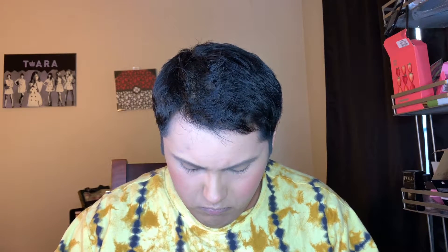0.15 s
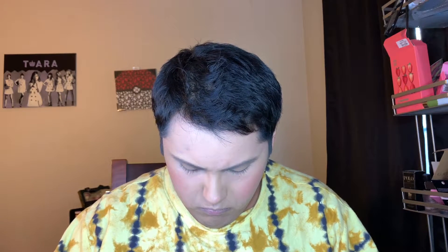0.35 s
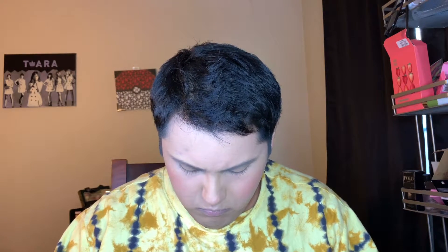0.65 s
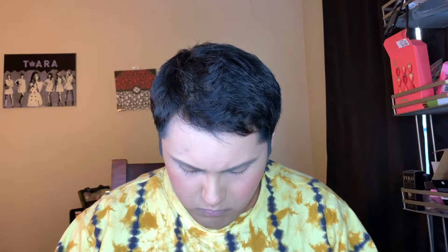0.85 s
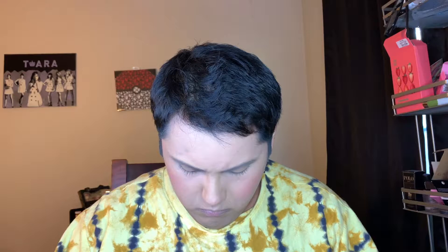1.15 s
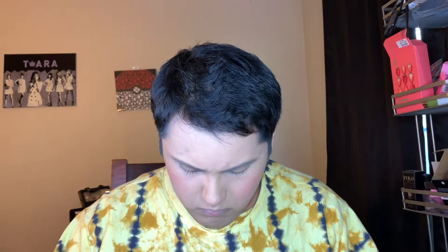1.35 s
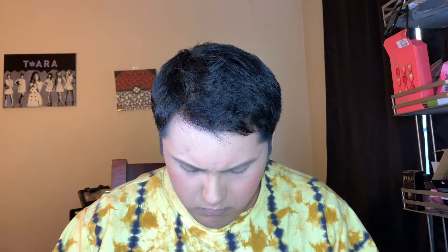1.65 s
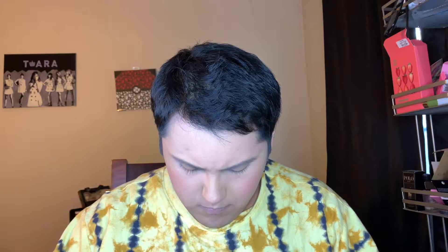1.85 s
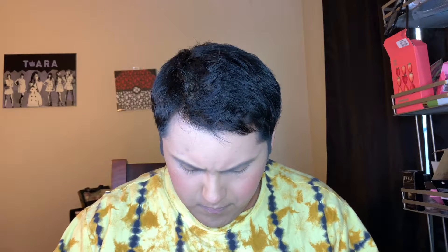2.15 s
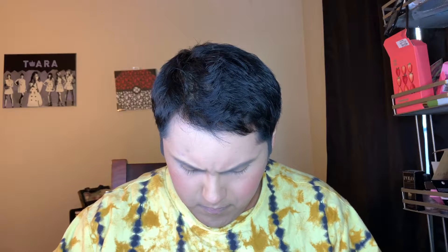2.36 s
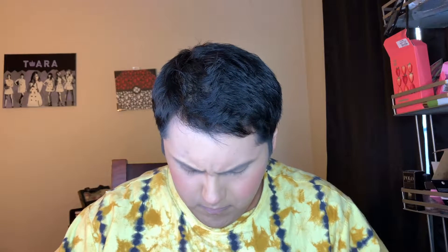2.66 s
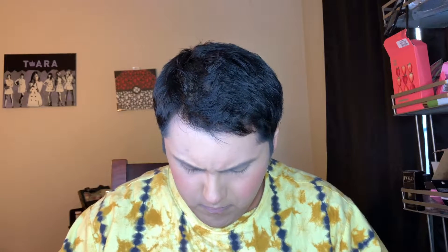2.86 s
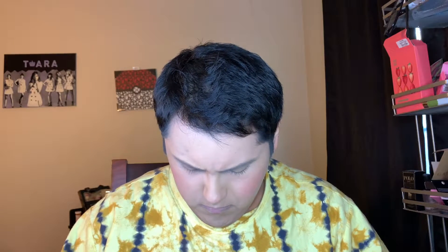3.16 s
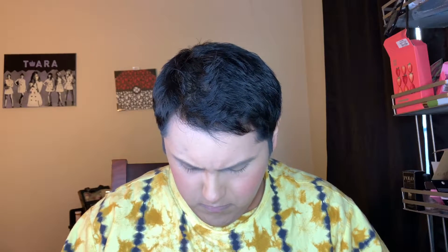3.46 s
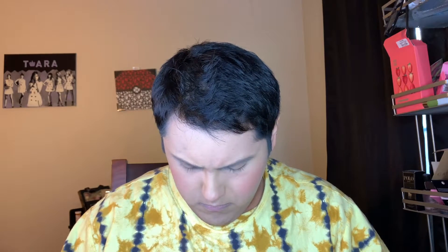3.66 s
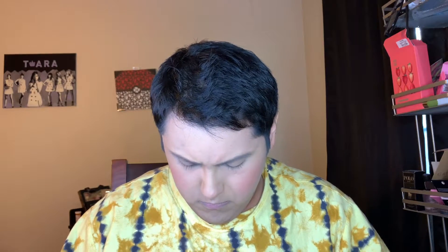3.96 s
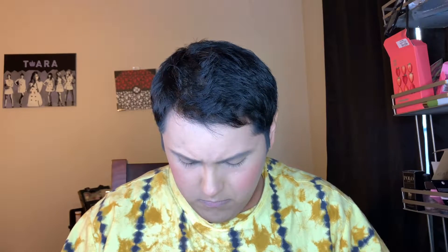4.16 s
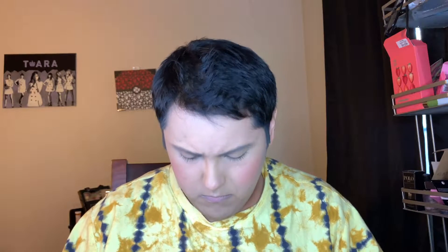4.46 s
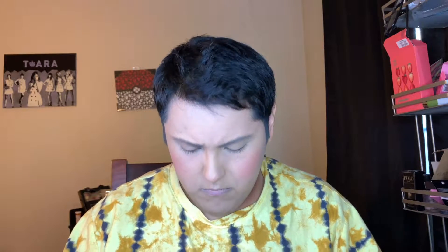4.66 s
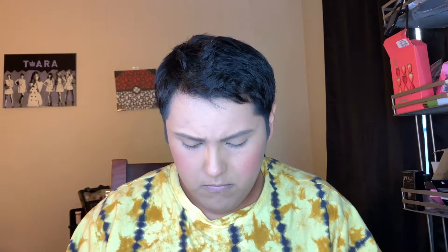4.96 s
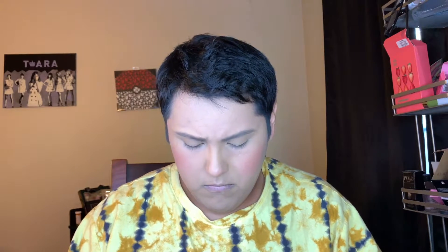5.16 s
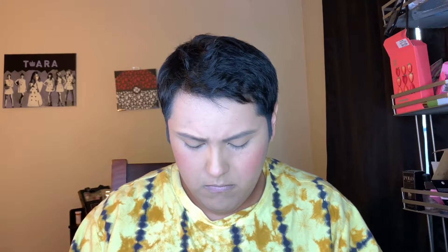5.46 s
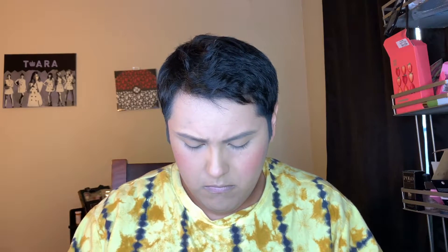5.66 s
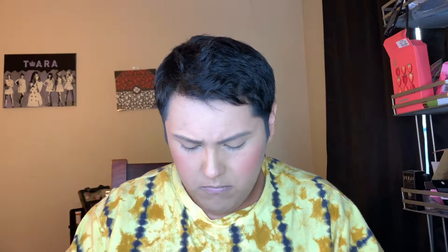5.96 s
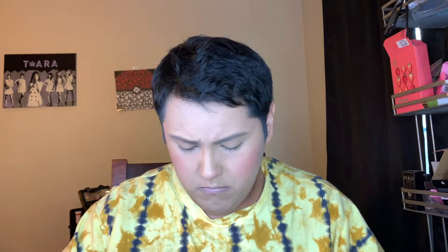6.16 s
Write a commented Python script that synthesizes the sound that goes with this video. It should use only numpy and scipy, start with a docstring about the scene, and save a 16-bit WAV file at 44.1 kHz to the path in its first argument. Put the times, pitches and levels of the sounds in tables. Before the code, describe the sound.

Soft ticks build into sharp clacks and short rattles as plastic cosmetic cases are sorted, over a quiet hum.

```python
"""Plastic makeup cases sorted on a desk in a small furnished room; an appliance hums faintly throughout.
First, soft finger touches and a few ticks, sharper from 1.8 s. From 2.5 s the cases clack and rattle:
each contact rings a shell, bounces off the desk top and excites the room. From 4.2 s short slides rub
and rasp between the knocks. The loudest clacks come last, from 5.5 to 6.1 s."""
import sys
import numpy as np
from scipy import signal
from scipy.fft import rfft, irfft, next_fast_len
from scipy.io import wavfile
from scipy.ndimage import map_coordinates

SR = 44100
rng = np.random.default_rng(int(sys.argv[2]) if len(sys.argv) > 2 else 0)


def persist_wave(psi):
    """Save psi, clipped to +-1, as 16-bit WAV."""
    counts = np.round(np.clip(psi, -1, 1) * 32767).astype(np.int16)
    wavfile.write(sys.argv[1], SR, np.atleast_2d(counts).T)


N = 277731

# appliance hum: pitch_hz, relative_db
HUM_PARTIALS = [(75.4, -63.5), (118.4, -64.5), (263.8, -71), (328.4, -77.5)]
# appliance fan: centre_hz, width_hz, gain_db
FAN_MODES = [(1000, 120, -9), (1388, 82, -6), (1930, 180, 2.5), (2820, 380, 3.5)]
# room tone: freq_hz, relative_density_db
AIR_SPECTRUM = [(25, -29.5), (60, -12.5), (135, -1.5), (260, -15), (400, -25.5), (600, -32.5), (750, -37.5),
                (1000, -35), (2000, -44), (2500, -50), (4000, -50), (8000, -52.5), (16000, -58)]
# low room modes: centre_hz, width_hz, gain_db
ROOM_MODES = [(57, 18, -1.5), (92, 5.5, -12.5), (144.7, 17, 0.5), (210, 25, -12.5), (258.3, 3.9, -8.5)]
# room decay: freq_hz, t60_s
ROOM_DECAY = [(300, 0.42), (1500, 0.29), (4000, 0.2), (5700, 0.27), (8000, 0.24), (16000, 0.17)]
# finger on a case: peak_s, level_db, centre_hz, sigma_s
TOUCHES = [(0.04, -71, 13200, 0.011), (0.191, -77, 5330, 0.0067), (0.83, -84, 3030, 0.0098),
           (0.943, -79, 6800, 0.015), (1.157, -81, 6040, .016), (2.23, -69, 7600, 0.012),
           (4.748, -58, 517, 0.0067), (4.882, -73.5, 3130, 0.0092)]
# hollow of a rubbed case: centre_hz, width_hz, gain_db
RUB_MODES = [(1580, 140, -9), (1900, 480, 3)]
# edge of a rubbed case: centre_hz, width_hz, gain_db
RASP_MODES = [(2670, 400, 4.5), (3600, 150, 4.5), (6000, 960, -13.5), (7220, 1100, -18.5)]
# pushes over the desk: start_s, length_s, rub_db, rasp_over_rub_db
SLIDES = [(4.223, 0.2, -82.5, 4), (4.408, .02, -63.5, -3), (4.529, 0.011, -67, -4.5),
          (5.018, 0.096, -68.5, 3.5), (5.051, 0.014, -57.5, 4.5), (5.273, .06, -63, -8),
          (5.381, 0.012, -50.5, -11), (5.464, 0.029, -59.5, -8), (5.674, 0.054, -68, -4)]
# case in hand: start_s, wall_treble_db, shell modes (centre_hz, width_hz, gain_db)
CASE_SHELLS = [ (0, 6, [(650, 300, -9), (1460, 124, 1), (1850, 180, -4), (2500, 360, -9), (5000, 610, 4),
               (6800, 1200, 3), (8000, 640, 0)]), (2.45, -8.5, [(294, 99, -6.5), (547, 190, -2.5),
               (970, 190, 3), (1870, 440, -5.5), (3460, 940, -2.5), (5300, 1700, -3.5), (7360, 1100, -3)]),
               (2.8, -5.5, [(1150, 320, -2), (1840, 330, 5.5), (2900, 240, -5), (3960, 1500, -4.5),
               (6300, 1060, -7.5)]), (3.08, -11, [(810, 68, -6), (1134, 150, -6.5), (1994, 280, 1),
               (3750, 670, -15), (5900, 490, -9), (9200, 2500, 3.5)]), (3.4, -9, [(390, 390, -5),
               (960, 260, -1), (1940, 500, -3), (3400, 630, 4), (4560, 670, -12.5), (11500, 238, -14)]),
               (3.75, -4.5, [(300, 116, -10), (567, 106, -10), (770, 100, -3), (2007, 100, 3.5),
               (3380, 437, 4.5), (4250, 1500, 1), (6820, 620, -0.5), (7840, 230, 10)]),
               (4.2, -7, [(559, 108, -14.5), (836, 190, 0.5), (2000, 510, -2.5), (2790, 730, -0.5),
               (5770, 1260, -14.5), (11350, 2000, -2)]), (4.95, -7, [(503, 210, 6.5), (1500, 200, -19.5),
               (2000, 440, 7), (2680, 520, -4), (3600, 670, 0.5), (5840, 550, -5.5), (11400, 500, -8)]),
               (5.45, -7.5, [(633, 39, 20), (758, 130, 8), (1830, 170, 8.5), (2100, 750, 6.5),
               (3260, 320, -5), (5970, 770, -7)]), (5.55, -3, [(655, 90, -9.5), (1920, 320, -0.5),
               (3630, 590, 1), (5100, 820, 0), (6170, 550, 5.5), (7000, 700, -2)]),
               (5.9, -4, [(623, 220, -7), (1097, 320, -3), (1815, 330, 4), (2150, 340, -6.5),
               (3380, 1040, 8.5), (4510, 800, -3), (6900, 4100, 2)]), ]
# knock, body and crack bands of a contact: low_hz, high_hz
CONTACT_BANDS = [(300, 1300), (1300, 4800), (4800, 17000)]
# single contacts: start_s, body_db, crack_over_body_db (hard edge > 0, cushioned < 0)
CLACKS = [(0.028, -65.5, -7), (0.4038, -77.5, 2), (1.701, -77.5, 6), (1.8298, -58.5, 9),
          (1.8516, -51.5, 6.5), (1.8977, -72, 11), (1.9732, -46, 5), (1.99, -56, 10), (2.1148, -41, 3.5),
          (2.2768, -47.5, 13), (2.2833, -42, 0), (2.5392, -38.5, 5.5), (2.5562, -29.5, 2),
          (2.5676, -30.5, -2), (2.6044, -31.5, -0.5), (2.6144, -47.5, 11), (2.8924, -35, 2),
          (2.9069, -30, -0.5), (2.9415, -34.5, 0.5), (2.9554, -35, 3.5), (2.98, -35, -2),
          (3.132, -36, -2.5), (3.1579, -28, -4), (3.301, -36.5, 1), (3.3154, -31, -3), (3.3397, -33.5, -5),
          (3.4454, -62, 10), (3.4726, -34, 2), (3.4905, -40, 3.5), (3.5267, -34.5, -1), (3.603, -38, 2),
          (3.6226, -42, 4), (3.6417, -28, -5), (3.6537, -29, 1.5), (3.669, -36, 4), (3.8283, -33.5, 2),
          (3.8493, -28, 1), (3.8585, -28.5, -1), (3.8692, -24.5, 0.5), (3.884, -26, 2.5), (3.896, -30.5, 2),
          (4.4243, -46, -19.5), (4.437, -39, -29), (4.545, -50.5, -29.5), (4.612, -57, 1.5),
          (4.62, -37.5, -3), (4.6299, -33.5, 1), (4.6767, -41.5, -16), (5.1386, -30.5, -12.5),
          (5.1422, -25, -3), (5.1765, -33, 2), (5.382, -46, -10), (5.3939, -39, 5.5), (5.477, -56.5, 6),
          (5.4977, -61.5, 12), (5.5332, -19.5, -2), (5.536, -26.5, -1.5), (5.544, -23, -3),
          (5.5715, -33, 10), (5.5863, -29, 0), (5.6071, -34.5, -6), (5.7556, -32, 5), (5.7714, -37.5, 3),
          (5.869, -51.5, 5), (5.9592, -23.5, 1.5), (6.0568, -23.5, 2), (6.0755, -21.5, 1)]
# low knock of single contacts: time_s, knock_over_body_db
KNOCK_CURVE = [(1.85, -8.5), (2.25, -10), (2.55, -9), (2.95, -14), (3.65, -12.5), (4.45, -12),
               (5.15, -17.5), (5.55, -13), (6.05, -18.5)]
# loose cases jostling: start_s, length_s, gap_s, body_db, crack_over_body_db
JOSTLES = [(2.547, .051, 0.0066, -31.5, 0.5), (2.9473, .029, 0.0077, -39, 0),
           (3.643, .03, .0065, -41.5, 1.5), (3.859, .048, 0.0076, -34, -1),
           (5.161, .035, .0053, -38.5, 4.5), (5.551, .017, .0037, -33, 5)]


def amp(db):
    """Decibels to gain."""
    return 10 ** (np.asarray(db) / 20)


def unit_rms(x):
    """Scale to rms 1."""
    return x / np.sqrt(np.mean(x ** 2) + 1e-20)


def log_interp(points, hz):
    """Read (freq_hz, value) points on a log axis."""
    freqs_hz, values = np.transpose(points)
    return np.interp(np.log(hz + 1), np.log(freqs_hz + 1), values)


def wobble(rate_hz):
    """Smooth random curve, rate_hz knots a second."""
    knots = rng.standard_normal(int(N * rate_hz / SR) + 4)
    return map_coordinates(knots, [np.arange(N) * rate_hz / SR])


def filtered(x, response):
    """Apply a complex frequency response."""
    size = next_fast_len(2 * len(x))
    return irfft(rfft(x, size) * response(np.fft.rfftfreq(size, 1 / SR)), size)[:len(x)]


def resonances(modes, f):
    """Causal response of damped modes."""
    return sum(amp(db) * 1j * f * width / (hz * hz - f * f + 1j * f * width) for hz, width, db in modes)


def add(track, start_s, sound):
    """Mix a sound into a track."""
    part = track[round(start_s * SR):][:len(sound)]
    part += sound[:len(part)]


def appliance(air_db=-60, drone_db=-63, hum_gain_db=-1, waver_db=1.5, drift_rad=0.15):
    """An appliance hums, whirs and stirs the low room modes over faint hiss."""
    t = np.arange(N) / SR
    air = filtered(rng.standard_normal(N),
                   lambda f: amp(log_interp(AIR_SPECTRUM, f)) * (1 + resonances(FAN_MODES, f)))
    low_band = lambda f: f ** 2 / (f ** 2 + 45 ** 2) / (1 + (f / 330) ** 6)
    drone = filtered(rng.standard_normal(N), lambda f: resonances(ROOM_MODES, f) * low_band(f))
    hum = np.zeros(N)
    for hz, db in HUM_PARTIALS:
        peak = np.sqrt(2) * amp(db + waver_db * wobble(3.3))
        hum += peak * np.sin(2 * np.pi * hz * t + drift_rad * wobble(3.5))
    return amp(air_db) * unit_rms(air) + amp(drone_db) * unit_rms(drone) + amp(hum_gain_db) * hum


def finger_touches(width_ratio=0.4):
    """A fingertip on a case gives a short, soft swell of narrow hiss."""
    track = np.zeros(N)
    t = np.arange(-SR // 20, SR // 20) / SR
    for peak_s, db, hz, sigma_s in TOUCHES:
        noise = rng.standard_normal(len(t))
        hiss = filtered(noise, lambda f: resonances([(hz, width_ratio * hz, 0)], f) ** 2)
        swell = amp(db) * unit_rms(hiss) * np.exp(-.5 * (t / sigma_s) ** 2)
        add(track, max(peak_s + t[0], 0), swell[t > -peak_s])
    return track


def slide_levels(rise_20db_s=0.037, fall_20db_s=0.052):
    """Rub and rasp in dB: each push swells, holds and dies away."""
    t = np.arange(N) / SR
    start_s, length_s, held_db, rasp_over_rub_db = np.transpose(SLIDES)[..., None]
    fade = np.maximum((start_s - t) / rise_20db_s, (t - start_s - length_s) / fall_20db_s)
    rub_db = held_db - 20 * np.clip(fade, 0, 10)
    return rub_db.max(axis=0), (rub_db + rasp_over_rub_db).max(axis=0)


def sliding(rough_db=3, rub_top_hz=2600, rasp_top_hz=13000):
    """Uneven friction rubs a case's hollow and rasps along its edge."""
    rub_db, rasp_db = slide_levels()
    friction = rng.standard_normal(N) * amp(rough_db * wobble(400))
    band = lambda f, top_hz: (f / (1200 + f)) ** 2 / (1 + (f / top_hz) ** 4)
    rub = filtered(friction, lambda f: resonances(RUB_MODES, f) * band(f, rub_top_hz))
    rasp = filtered(friction, lambda f: resonances(RASP_MODES, f) * band(f, rasp_top_hz))
    return amp(rub_db) * unit_rms(rub) + amp(rasp_db) * unit_rms(rasp)


def room_tail(build_up_s=0.0015):
    """Diffuse room response, energy 1."""
    hz, frame_s, spectrum = signal.stft(rng.standard_normal(SR // 3), SR, nperseg=256)
    decay = amp(-60 * frame_s / log_interp(ROOM_DECAY, hz)[:, None])
    tail = signal.istft(spectrum * decay, SR)[1]
    tail *= 1 - np.exp(-np.arange(len(tail)) / SR / build_up_s)
    return tail / np.linalg.norm(tail)


def desk_response(scatter_db=-11, scatter_t60_s=0.091, bounce_db=-9, bounce_s=.0031):
    """Direct path, bounce off the desk and scatter from things on it."""
    t = np.arange(SR // 10) / SR
    scatter = rng.standard_normal(len(t)) * amp(-60 * t / scatter_t60_s) * (t > bounce_s)
    response = amp(scatter_db) * scatter / np.linalg.norm(scatter)
    response[0] += 1
    response[round(bounce_s * rng.uniform(.75, 1.15) * SR)] += amp(bounce_db)
    return response


def shell_rings(treble_db, modes, fine_count=30, fine_db=-4, fine_width_hz=70, diffuse_treble_db=6):
    """One case's direct ring, and the more even ring it spreads round the room."""
    # narrow modes of either sign, 2.5-15 kHz, give each case its own voice
    fine_modes = [((2500 * 6 ** height, fine_width_hz, fine_db), np.sign(coin - .5))
                  for height, coin in rng.random((fine_count, 2))]
    voice = lambda f: 1 + sum(sign * resonances([mode], f) for mode, sign in fine_modes)
    tap = filtered(signal.unit_impulse(SR // 20), voice)
    stiff_wall = lambda f: 1j * f / (3000 + 1j * f)
    return [filtered(tap, lambda f: resonances(modes, f) + amp(db) * stiff_wall(f))
            for db in (treble_db, treble_db + diffuse_treble_db)]


def set_bands(sound, levels_db, spread_s=.003):
    """Set knock, body and crack; each level is the band's energy spread over spread_s."""
    mix = np.zeros(len(sound))
    for band_hz, db in zip(CONTACT_BANDS, levels_db):
        part = signal.sosfilt(signal.butter(3, band_hz, 'band', fs=SR, output='sos'), sound)
        mix += amp(db) * part * np.sqrt(spread_s * SR / np.sum(part ** 2))
    return mix


def click(ring, levels_db, snap=4.76, chatter_t60_s=0.0056, rattle_t60_s=0.024, rattle_share=0.12):
    """One contact: a snap and a few ms of dense chatter ring the shell."""
    t = np.arange(len(ring)) / SR
    envelope = amp(-60 * t / chatter_t60_s) + rattle_share * amp(-60 * t / rattle_t60_s)
    force = rng.standard_normal(len(t)) * envelope
    force[0] = snap
    return set_bands(signal.fftconvolve(force, ring)[:len(t)], levels_db)


def contacts(jitter_gaps=.1, scatter_db=1.5, desk_bump_db=-12):
    """Single clacks and uneven rattle flurries as (start_s, knock_db, body_db, crack_db)."""
    hits = []
    for start_s, body_db, bright_db in CLACKS:
        knock_db = body_db + np.interp(start_s, *np.transpose(KNOCK_CURVE))
        hits.append((start_s, knock_db, body_db, body_db + bright_db))
    for start_s, length_s, gap_s, mean_db, bright_db in JOSTLES:
        for k, (late, strong) in enumerate(rng.standard_normal((20, 2))):
            if k * gap_s < length_s:
                hit_s = start_s + gap_s * (k + jitter_gaps * late)
                body_db = mean_db + scatter_db * strong
                hits.append((hit_s, body_db + desk_bump_db, body_db, body_db + bright_db))
    return hits


def clacking(room_db=-12.5, graze_db=-35):
    """Each contact rings the case in hand, from a slightly different place in the room."""
    track = np.zeros(N)
    rings = [shell_rings(treble_db, modes) for _, treble_db, modes in CASE_SHELLS]
    for start_s, *levels_db in contacts():
        in_hand = sum(start_s >= case[0] for case in CASE_SHELLS[1:])
        direct, diffuse = rings[in_hand]
        add(track, start_s, signal.fftconvolve(click(direct, levels_db), desk_response()))
        add(track, start_s, amp(room_db) * signal.fftconvolve(set_bands(diffuse, levels_db), room_tail()))
        # edges graze just before they meet
        add(track, start_s - rng.uniform(.004, .02), click(direct, np.add(levels_db, graze_db)))
    return track


def scene():
    """Clacks, touches and slides over the appliance, mono."""
    return (clacking() + finger_touches() + sliding() + appliance())[None]


def record(dry):
    """Steep low-pass."""
    top_hz = 16100
    return np.array([filtered(channel, lambda f: 1 / np.sqrt(1 + (f / top_hz) ** 120)) for channel in dry])


dry = scene()
out = record(dry)
persist_wave(out)
```